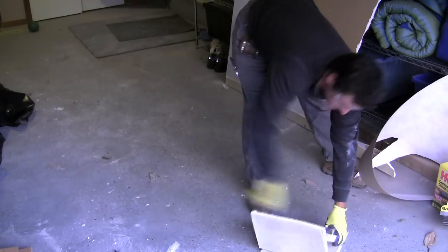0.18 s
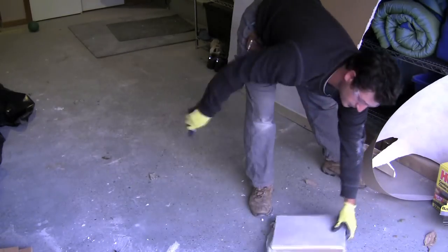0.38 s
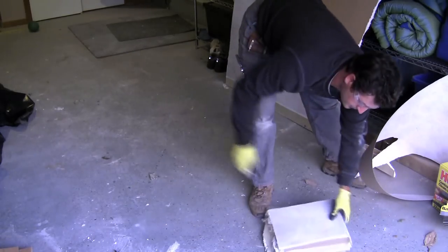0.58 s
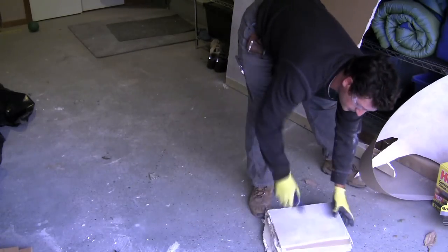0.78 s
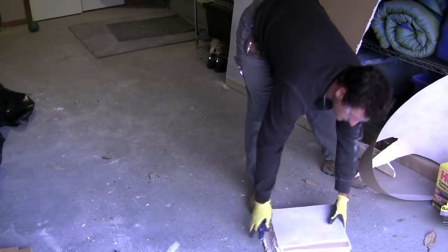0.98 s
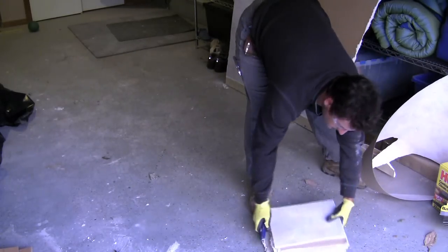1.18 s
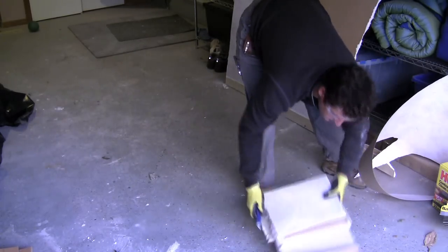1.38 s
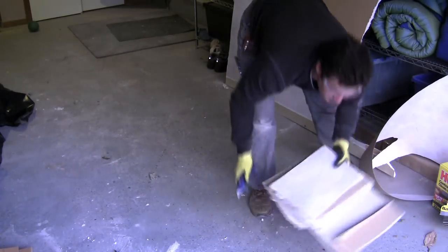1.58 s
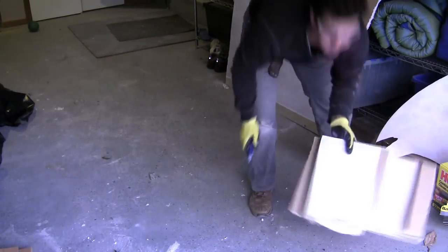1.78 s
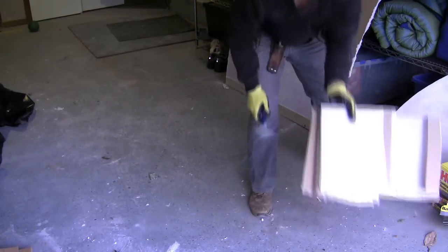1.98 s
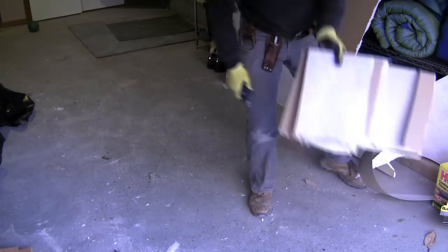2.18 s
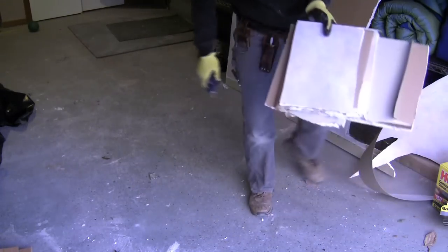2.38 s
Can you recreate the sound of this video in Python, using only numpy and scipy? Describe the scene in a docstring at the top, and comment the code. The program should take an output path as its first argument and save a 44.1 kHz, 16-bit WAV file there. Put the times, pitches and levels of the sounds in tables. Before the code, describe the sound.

Drywall piece slaps down with a hard crack after a short knife rip, then skids and rustles

```python
"""Knife and drywall in a garage

A utility knife rips the paper backing of a folded piece of drywall: dense fibre impulses shake the sheet.
The freed piece slaps onto the stack and skids: short contact bursts drive board modes, edge catches add grit.
Gloved hands slide the pieces together and a shoe scuffs: swelling grains of friction, over noise and low hum.
Varying reflection paths form the room; a limiter ducks after the slap and recovers slowly."""
import sys
import numpy as np
from scipy import signal
from scipy.fft import rfft, irfft, next_fast_len
from scipy.io import wavfile

SR = 44100
rng = np.random.default_rng(int(sys.argv[2]) if len(sys.argv) > 2 else 0)


def master_out(mix):
    """Clip the mix to full scale and print it as 16-bit PCM to the path in sys.argv[1]."""
    frames = np.transpose(np.atleast_2d(mix))
    ceiling = np.clip(frames, -1, 1)
    pcm = np.round(ceiling * 32767).astype(np.int16)
    wavfile.write(sys.argv[1], SR, pcm)


N = 105840
TIME = np.arange(N) / SR
PADDED = next_fast_len(N + SR // 2, True)  # FFT length that also holds the room tail
GRIT_PER_S, GRIT_SPREAD_DB = 3300, 4
# Jolts of the board and knocks of board on board: (time [s], force level [dB], force cutoff [Hz],
# clatter decay [s], ring frequency [Hz], ring level [dB])
BOARD_KNOCKS = [(.146, -35.5, 333, 0.032, 377, -31), (.2378, -24, 5000, 0.0024, 402, -19),
                (.314, -29, 1203, 0.0095, 1024, -10.5), (.508, -18, 790, 0.0073, 616, -14.5),
                (.5225, -25, 660, 0.0032, 460, -18), (0.5353, -11, 2290, 0.0054, 352.3, -9),
                (.5465, -5, 3280, 0.0026, 1016, 1.5), (.752, -18, 1400, 0.0045, 584, -11.5),
                (.797, -28, 1100, 0.0027, 518, -19.5), (.809, -38, 700, 0.027, 574, -15.5),
                (1.104, -38.5, 2400, .014, 564, -54), (1.155, -35, 657, 0.0055, 636, -34.5),
                (1.181, -30, 695, 0.029, 276, -27), (1.213, -35.5, 1100, 0.015, 526, -24),
                (1.2555, -37, 2800, 0.0021, 525, -32), (2.275, -56, 1180, 0.0041, 601, -37)]


def from_db(db):
    """Amplitude ratio: a level of 20 dB is a factor of ten."""
    return 10 ** (np.asarray(db) / 20)


def rms_one(x):
    """Normalization: scale a signal to unit root-mean-square value."""
    return x / np.sqrt(np.mean(x ** 2) + 1e-20)


def at_hz(points, hz):
    """Logarithmic frequency scale: interpolate a table along it."""
    table_hz, values = np.transpose(points)
    return np.interp(np.log(np.maximum(hz, 1)), np.log(table_hz), values)


def colour(x, points, modes=()):
    """Minimum-phase filtering: a causal response from a magnitude spectrum, raised at resonant modes."""
    size = 2 * N
    hz = np.arange(N + 1) * SR / size
    power = 1
    for mode_hz, db, t60 in modes:
        detuning = (hz - mode_hz) * 2 * np.pi * t60 / np.log(1000)
        power = power + from_db(db) ** 2 / (1 + detuning ** 2)
    magnitude = rms_one(from_db(at_hz(points, hz)) * np.sqrt(power))
    # Folding the cepstrum onto positive times makes the filter causal
    cepstrum = irfft(np.log(magnitude))
    cepstrum[1:N] *= 2
    cepstrum[N + 1:] = 0
    response = np.exp(rfft(cepstrum))
    return irfft(rfft(x, size) * response)[..., :N]


def grains(per_s, spread_db):
    """Random impulse train: independent clicks of either sign and uneven size, rms 1."""
    sizes = from_db(spread_db * np.minimum(rng.exponential(1, N), 4))
    signs = rng.choice([-1, 1], N)
    present = rng.random(N) < per_s / SR
    return rms_one(sizes * signs * present)


def swells(rows):
    """Exponential growth and decay: strokes rise to a peak, fall away and add in power."""
    power = 0
    for peak_s, db, rise, fall in rows:
        decay = np.maximum((peak_s - TIME) / rise, (TIME - peak_s) / fall)
        power = power + (from_db(db) * np.exp(-decay)) ** 2
    return np.sqrt(power)


def stereo(mid, side):
    """Sum and difference: left is mid plus side, right is mid minus side."""
    return np.array([mid + side, mid - side])


def knife(room):
    """Fracture noise: paper fibres part one after another and excite the resonance of the held sheet."""
    # Pull of the blade through the paper: (time [s], level [dB])
    blade_pull = [(0.2328, -42), (0.238, -17.5), (0.258, -20.5), (.279, -23.5), (0.301, -24.5),
                  (0.319, -19.5), (0.344, -31.5), (0.364, -38), (0.377, -23.5), (0.399, -36), (.44, -75)]
    # Spectrum of the torn paper: (frequency [Hz], level [dB])
    paper_spectrum = [(60, -33), (170, -10.5), (280, -5), (420, 0), (800, -1.5), (1300, -0.5), (3000, -4),
                      (8000, -15.5), (12000, -23), (16000, -29.5)]
    # Mode of the held sheet: (frequency [Hz], added level [dB], T60 [s])
    sheet_modes = [(420, 7, 0.12)]
    s, db = np.transpose(blade_pull)
    pull = from_db(np.interp(TIME, s, db)) * (TIME > s[0]) * (TIME < s[-1])
    fibres = grains(per_s=12000, spread_db=1.5)
    return colour(garage(pull * fibres, room), paper_spectrum, sheet_modes)


def knocks(room):
    """Impact excitation: a push and a clatter of contacts, low-passed per knock, drive the board's modes."""
    # Spectrum of the struck board: (frequency [Hz], level [dB])
    board_spectrum = [(30, -29), (90, -31), (150, -9), (260, -6), (440, -3), (620, 1.5), (800, -7),
                      (1150, -0.5), (1600, -3.5), (2900, -3.5), (4500, -10), (8000, -20), (16000, -24)]
    # Modes of the board: (frequency [Hz], added level [dB], T60 [s])
    board_modes = [(532, 5, 0.06), (1208, 3, 0.27), (1524, 7.5, 0.033)]
    clatter_rise_s, push_share = 0.0028, 0.39
    force = np.zeros(N)
    contacts = grains(per_s=5000, spread_db=-1)
    span = SR // 10
    t = TIME[:span]
    for s, db, cutoff_hz, decay_s, _, _ in BOARD_KNOCKS:
        i = int(s * SR)
        envelope = np.exp(-t / decay_s) * (1 - np.exp(-t / clatter_rise_s))
        burst = rms_one(contacts[i:i + span] * envelope)
        burst[0] += push_share * np.sqrt(span)  # the push is a single impulse
        lowpass = signal.butter(2, cutoff_hz, fs=SR, output="sos")
        force[i:i + span] += from_db(db - 19) * rms_one(signal.sosfilt(lowpass, burst))
    return colour(garage(force, room), board_spectrum, board_modes)


def flexing(room):
    """Damped bending vibration: each knock rings at a pitch set by where the board is held and struck."""
    decay_cycles, rise_cycles = 8.6, 1.7
    out = np.zeros(N)
    t = TIME[:SR // 4]
    for s, _, _, _, hz, db in BOARD_KNOCKS:
        i = int(s * SR)
        cycles = hz * t
        envelope = np.exp(-cycles / decay_cycles) * (1 - np.exp(-cycles / rise_cycles))
        ring = np.sin(2 * np.pi * cycles) * envelope
        out[i:i + len(t)] += from_db(db) * ring[:N - i]
    return garage(out, room, wet_db=-8.5)


def crack():
    """Direct impulsive sound: flat faces meet in a very short noise burst, without reflections."""
    # Closing of the slap: (peak time [s], level [dB], rise [s], fall [s])
    closing = [(.5487, -2.5, 0.0019, 0.00092)]
    # Spectrum of the crack: (frequency [Hz], level [dB])
    crack_spectrum = [(900, -15.5), (3200, 4.5), (5300, -12), (16000, -28)]
    mid, side = swells(closing) * rng.standard_normal((2, N))
    return colour(stereo(mid, from_db(-9.5) * side), crack_spectrum)


def skid(room):
    """Stick-slip friction: the fallen piece's rough edge catches and slips on the grit."""
    # Skids of the edge: (peak time [s], level [dB], rise [s], fall [s])
    edge_skids = [(.60, -23.5, 0.047, 0.061), (.70, -23.5, 0.13, 0.031), (.762, -19, 0.023, 0.02)]
    # Spectrum of the skidding edge: (frequency [Hz], level [dB])
    skid_spectrum = [(80, -19.5), (160, -2.5), (260, -0.5), (380, 4.5), (590, 5.5), (800, 2), (2000, -3.5),
                     (2600, -6), (4800, -24), (16000, -57)]
    catches = grains(per_s=900, spread_db=GRIT_SPREAD_DB)
    return colour(garage(swells(edge_skids) * catches, room), skid_spectrum)


def handling(room):
    """Friction and impact: dusty paper faces slide as grains; crumbs and knife handle click as noise bursts."""
    # Paper faces sliding under the gloves: (peak time [s], level [dB], rise [s], fall [s])
    paper_slides = [(.03, -54, 0.11, 0.065), (.165, -52, 0.052, 0.03), (.505, -36, 0.055, 0.18),
                    (.765, -35.5, 0.14, 0.0067), (1.024, -41.5, 0.01, 0.041), (1.255, -38, 0.078, 0.049),
                    (1.415, -51.5, 0.09, 0.13), (2.10, -59, 0.16, 0.056), (2.17, -56.5, 0.0068, 0.057)]
    # Spectrum of the sliding paper: (frequency [Hz], level [dB])
    slide_spectrum = [(100, -21), (500, 1), (2500, 0), (4500, -7), (7000, -7), (10000, -16), (16000, -24)]
    # Clicks of crumbs and knife handle: (peak time [s], level [dB], fall [s])
    small_clicks = [(0.712, -26.5, 0.012), (1.182, -29, 0.002), (1.654, -44, 0.008), (1.839, -51.5, 0.0071)]
    # Spectrum of the clicks: (frequency [Hz], level [dB])
    click_spectrum = [(1200, 1.5), (3000, 8.5), (7500, -2), (16000, -16.5)]
    slides = swells(paper_slides) * grains(GRIT_PER_S, GRIT_SPREAD_DB)
    click_strokes = [(s, db, 1 / SR, fall) for s, db, fall in small_clicks]
    clicks = swells(click_strokes) * rng.standard_normal(N)
    sliding_sound = colour(garage(slides, room), slide_spectrum)
    return sliding_sound + colour(garage(clicks, room, wet_db=-3), click_spectrum)


def glove(room):
    """High-passed friction: a rubber glove slips on the paper with a thin, gritty hiss."""
    # Rubs of the glove: (peak time [s], level [dB], rise [s], fall [s])
    rubs = [(1.318, -43, 0.054, 0.014)]
    grit = swells(rubs) * grains(GRIT_PER_S, GRIT_SPREAD_DB)
    highpass = signal.butter(2, 6460, "high", fs=SR, output="sos")
    return signal.sosfilt(highpass, garage(grit, room))


def shoe(room):
    """Resonant friction: grit rolls under a sole on concrete and rasps at its own pitch in each drag."""
    # Drags of the sole: (peak time [s], level [dB], rise [s], fall [s], rasp frequency [Hz])
    sole_drags = [(2.35, -38.5, 0.036, 0.016, 2160), (2.397, -40, 0.012, 0.021, 3120)]
    # Spectrum of the scuff: (frequency [Hz], level [dB])
    scuff_spectrum = [(60, -6.5), (200, -1), (700, 4.5), (2600, -1), (4500, -10), (7500, -18.5),
                      (16000, -37)]
    rasp_db, rasp_q = 3.5, 25
    out = 0
    for *stroke, hz in sole_drags:
        drag = swells([stroke]) * grains(GRIT_PER_S, GRIT_SPREAD_DB)
        rasp = signal.lfilter(*signal.iirpeak(hz, rasp_q, fs=SR), drag)
        out = out + drag + from_db(rasp_db) * rasp
    return colour(garage(out, room), scuff_spectrum)


def room_response():
    """Early reflections and diffuse reverberation: noise decays at a rate of its own in each band."""
    # Reverberation time of the tail: (frequency [Hz], T60 [s])
    tail_t60 = [(600, 0.47), (8000, 0.32)]
    # Stereo width: (frequency [Hz], side level relative to mid [dB])
    side_level = [(60, 2), (250, -11.5), (500, -11.5), (1000, -8.5), (2200, -3), (5000, -1)]
    delay_s, build_s, early_db, early_fall_s = 0.0027, 0.0026, -0.5, 0.0044
    size = SR // 2
    t = TIME[:size]
    edges = 62 * 2 ** np.arange(0, 8.5, 2 / 3)  # Hz, bands two-thirds of an octave wide
    white = rng.standard_normal((2, 2, size))
    build = 1 - np.exp(-np.maximum(t - delay_s, 0) / build_s)
    early = from_db(early_db) * rms_one(np.exp(-t / early_fall_s))
    response = 0
    for k, (low, high) in enumerate(zip(edges, edges[1:])):
        hz = np.sqrt(low * high)
        tail = rms_one(build * np.exp(-np.log(1000) * t / at_hz(tail_t60, hz)))
        shape = np.hypot(early, tail)
        bandpass = signal.butter(2, [low, high], "band", fs=SR, output="sos")
        # Neighbouring bands use different noise
        mid, side = signal.sosfilt(bandpass, white[k % 2] * shape)
        side_gain = from_db(at_hz(side_level, hz))
        # Energy in proportion to bandwidth
        gain = np.sqrt(2 * (high - low) * np.mean(shape ** 2) / (SR * size))
        response = response + gain * stereo(rms_one(mid), side_gain * rms_one(side))
    return response


def garage(x, room, wet_db=0):
    """Superposition of reflection paths: sound leaves from ever-changing spots, each with its own response."""
    steps = np.arange(0, N / SR + 1, 1 / 100)  # new random shares 100 times a second
    targets = rng.standard_normal((len(steps), len(room)))
    shares = np.array([np.interp(TIME, steps, row) for row in targets.T])
    shares /= np.sqrt(np.sum(shares ** 2, axis=0))  # constant total power
    spots = rfft((x * shares).astype(np.float32), PADDED)
    paths = np.einsum("kf,kcf->cf", spots, room)  # sum over spots k, for each channel c
    return x + from_db(wet_db) * irfft(paths)[:, :N]


def background():
    """Stationary noise: soft room noise and a narrow resonance that makes a wavering low hum."""
    # Spectrum of the garage air: (frequency [Hz], level [dB])
    air_spectrum = [(25, -51), (55, -12), (90, -15), (125, -4.5), (185, -7.5), (600, -8), (1600, -22),
                    (7000, -38), (16000, -47.5)]
    hum_hz, hum_width_hz = 185.6, 12.6
    mid, side, drive = rng.standard_normal((3, N))
    air = colour(stereo(mid, side), air_spectrum)
    hum = signal.lfilter(*signal.iirpeak(hum_hz, hum_hz / hum_width_hz, fs=SR), drive)
    lowpass = signal.butter(2, 2 * hum_hz, fs=SR, output="sos")
    hum = rms_one(signal.sosfilt(lowpass, hum))
    return from_db(-50.5) * air + from_db(-53.5) * hum


def scene(count=10):
    """Linear superposition: the work, slightly louder on the left, adds to the background."""
    responses = [room_response() for _ in range(count)]
    room = rfft(np.array(responses, np.float32), PADDED)
    board = knocks(room) + flexing(room) + crack() + skid(room)
    work = from_db(-1) * (knife(room) + board + handling(room) + glove(room) + shoe(room))
    pan_db = 0.37
    return work * from_db([[pan_db], [-pan_db]]) + background()


def record(dry):
    """Dynamic compression: peaks are ducked with slow recovery, then softly clipped and low-passed."""
    limit_db, release_db_per_s, attack_s, ceiling = 1, 15, 0.0052, .74
    peak_db = 20 * np.log10(np.abs(dry).max(axis=0) + 1e-9)
    over = np.maximum(peak_db - limit_db, 0)
    # Hold each excess while it falls at the release rate
    release = release_db_per_s * TIME
    held = np.maximum.accumulate(over + release) - release
    r = np.exp(-1 / (attack_s * SR))
    reduction_db = signal.lfilter([1 - r], [1, -r], held)
    ducked = dry * from_db(-reduction_db)
    clipped = ceiling * np.tanh(ducked / ceiling)
    lowpass = signal.ellip(12, .1, 90, 15900, fs=SR, output="sos")  # .1 dB ripple, 90 dB stopband
    return signal.sosfilt(lowpass, clipped)


dry = scene()
out = record(dry)
master_out(out)
```